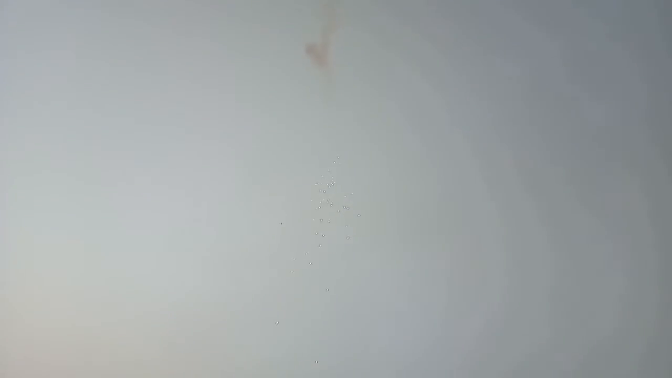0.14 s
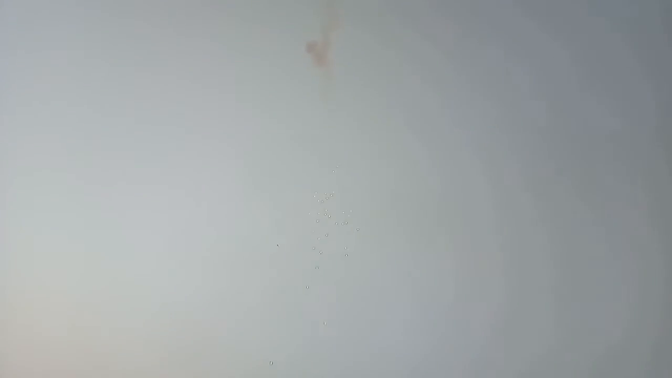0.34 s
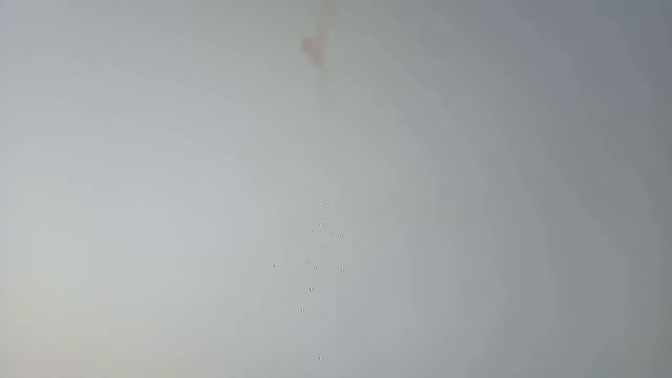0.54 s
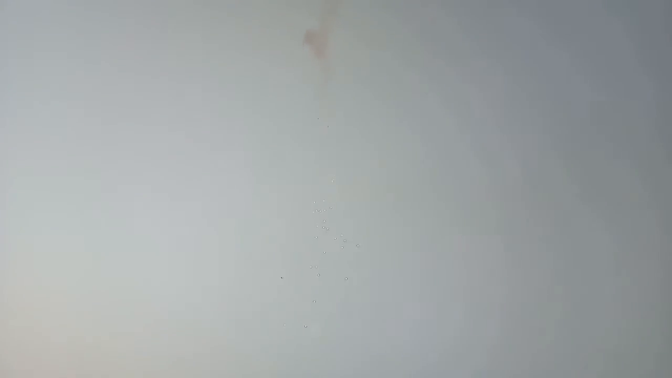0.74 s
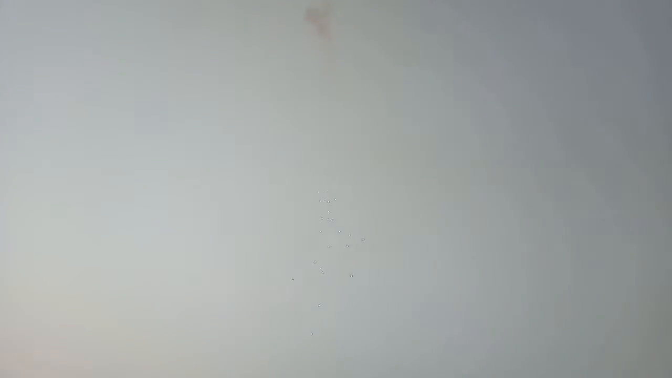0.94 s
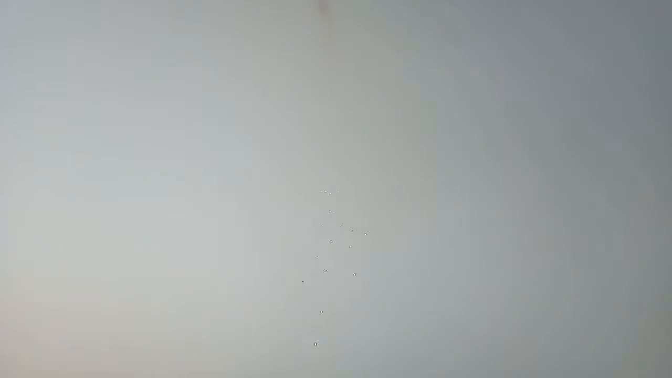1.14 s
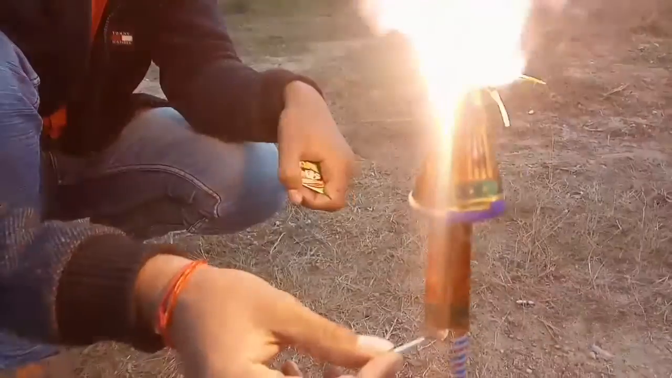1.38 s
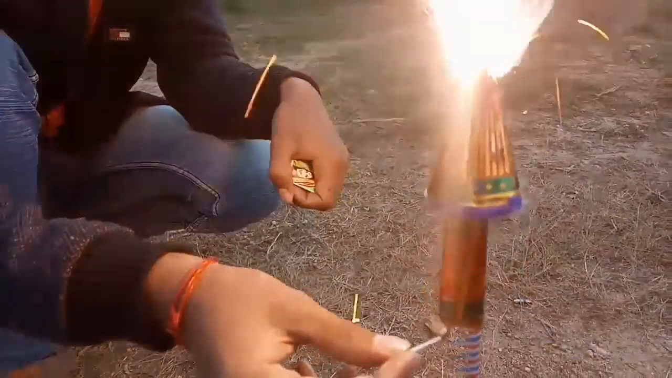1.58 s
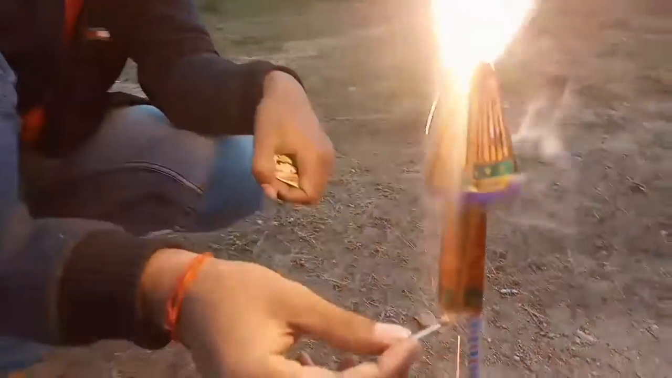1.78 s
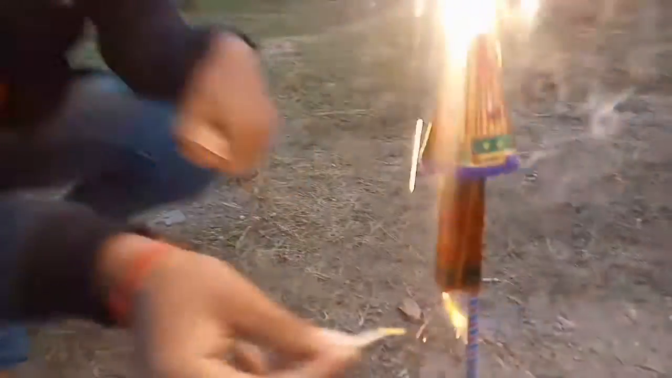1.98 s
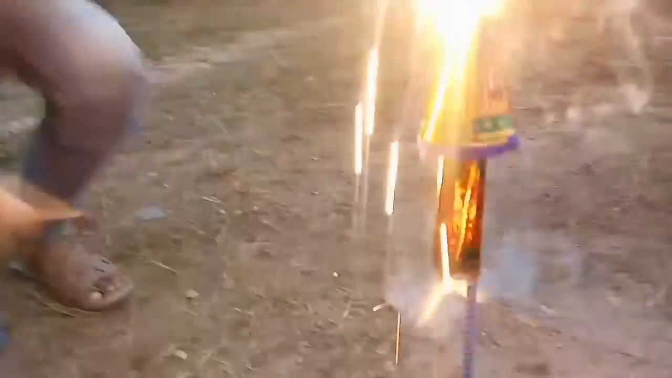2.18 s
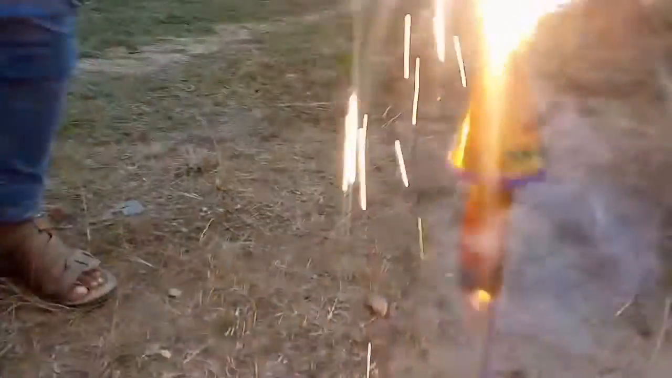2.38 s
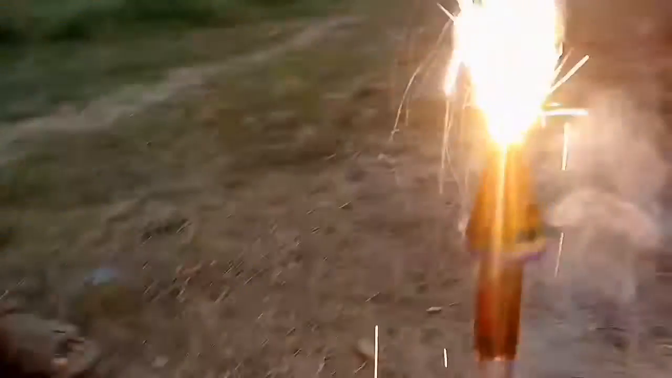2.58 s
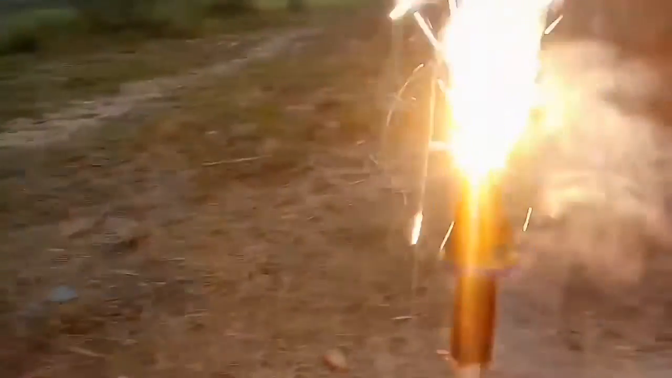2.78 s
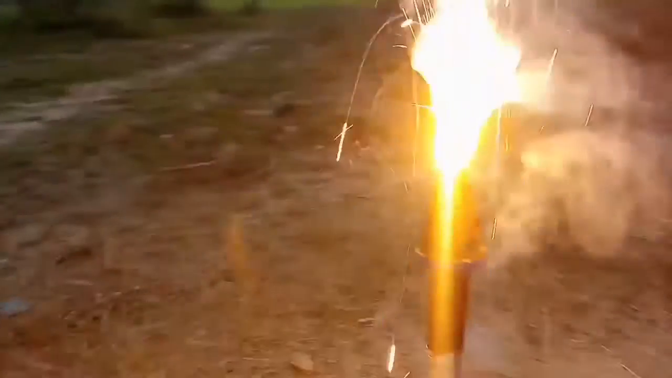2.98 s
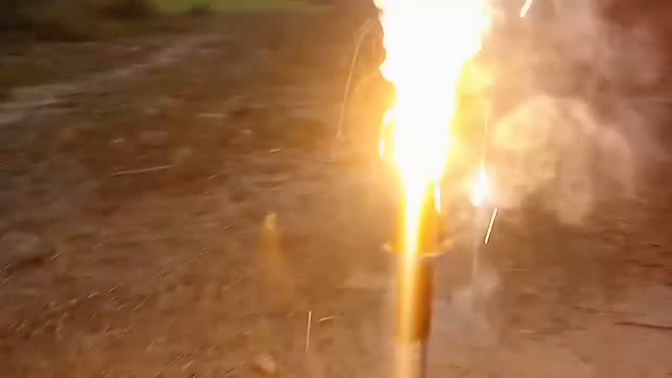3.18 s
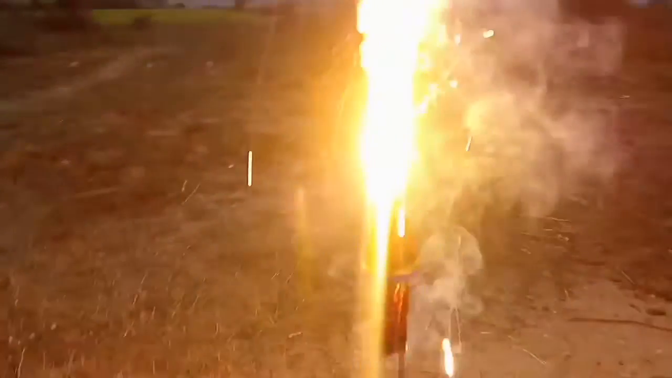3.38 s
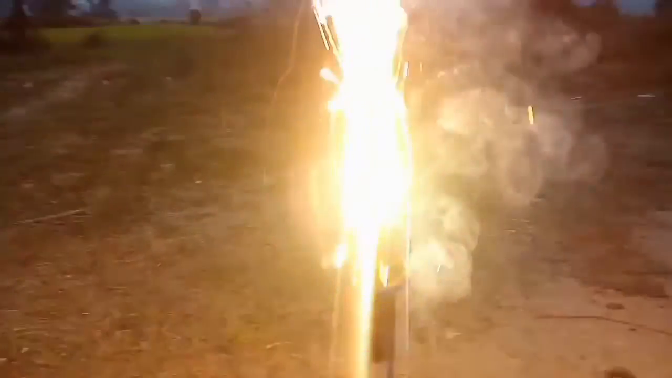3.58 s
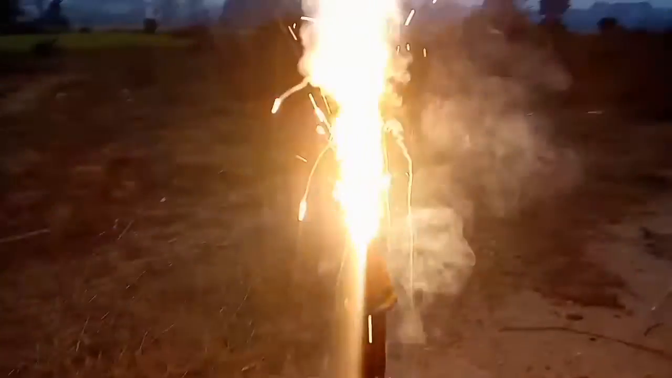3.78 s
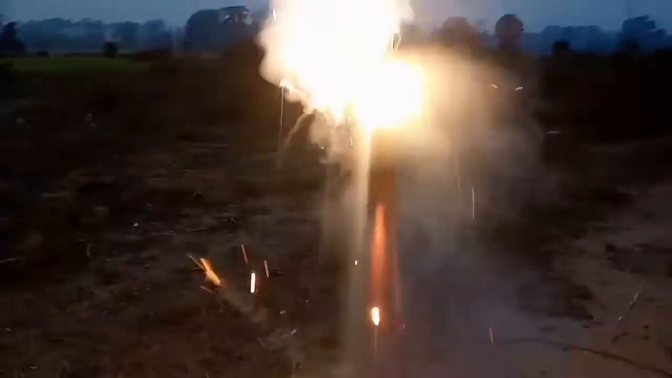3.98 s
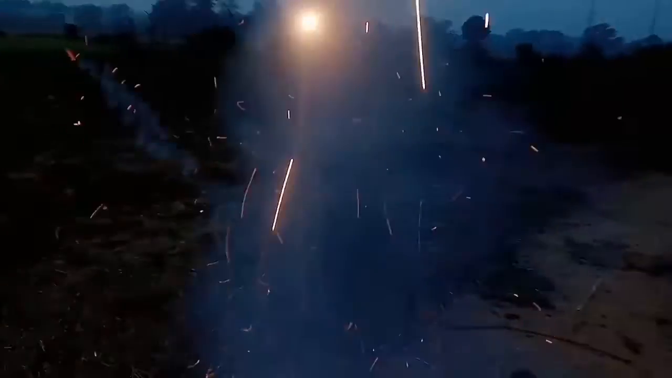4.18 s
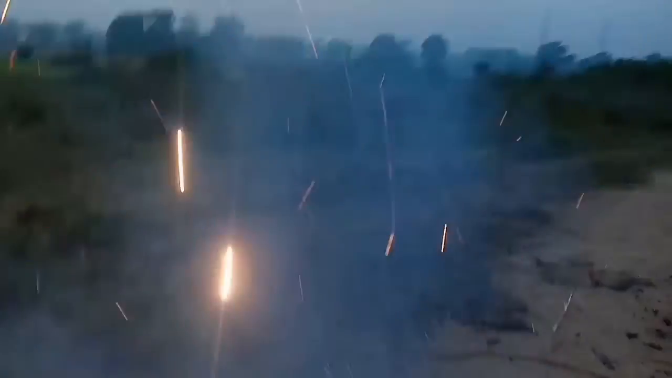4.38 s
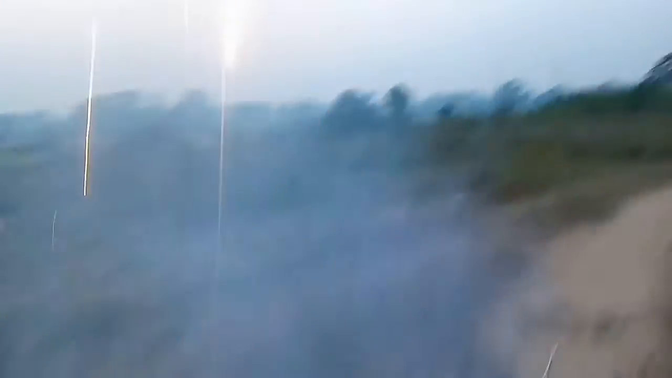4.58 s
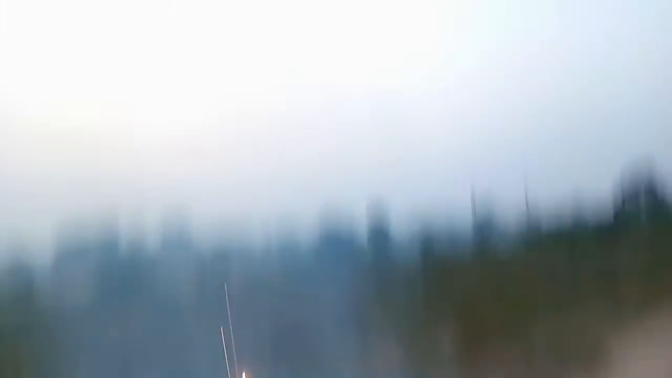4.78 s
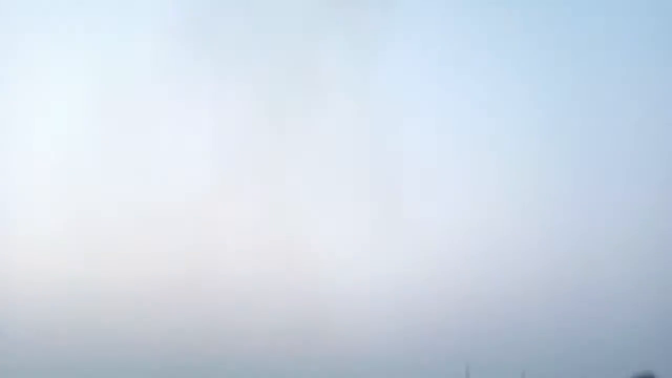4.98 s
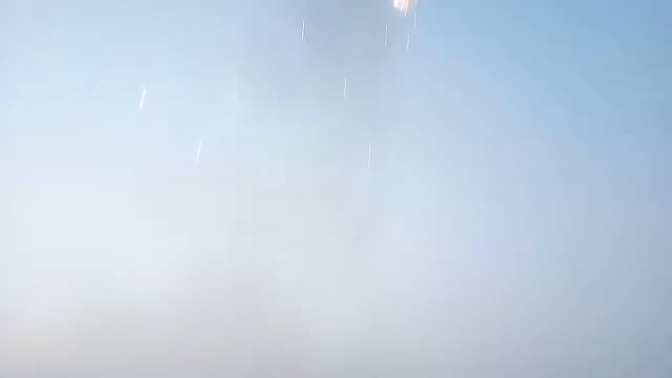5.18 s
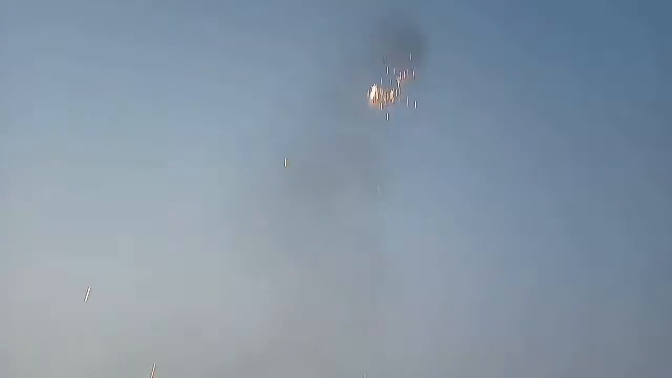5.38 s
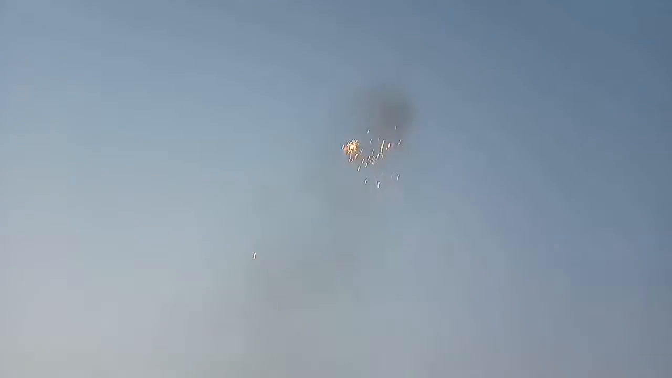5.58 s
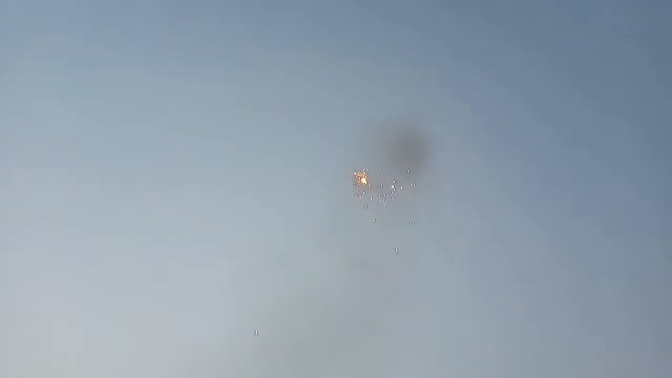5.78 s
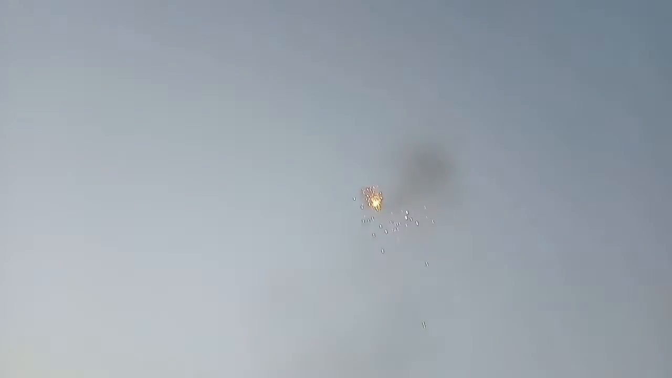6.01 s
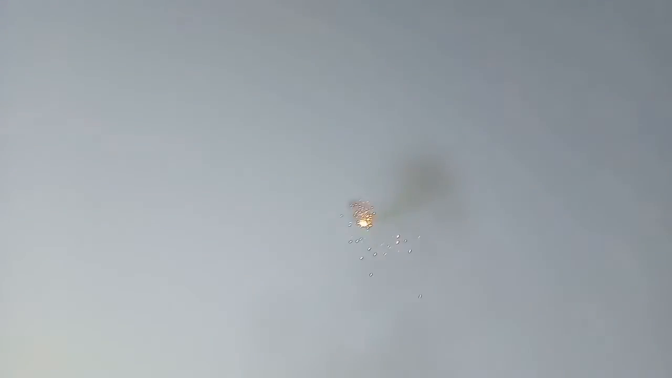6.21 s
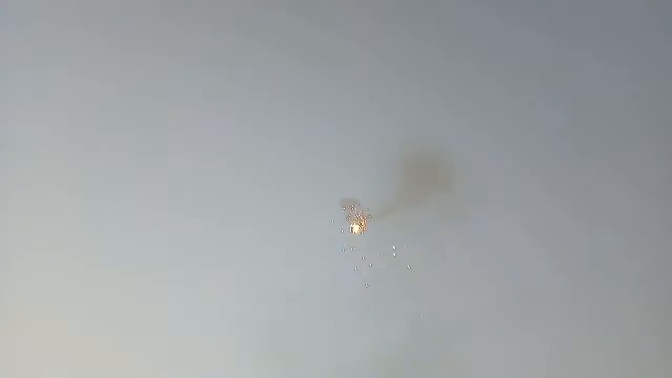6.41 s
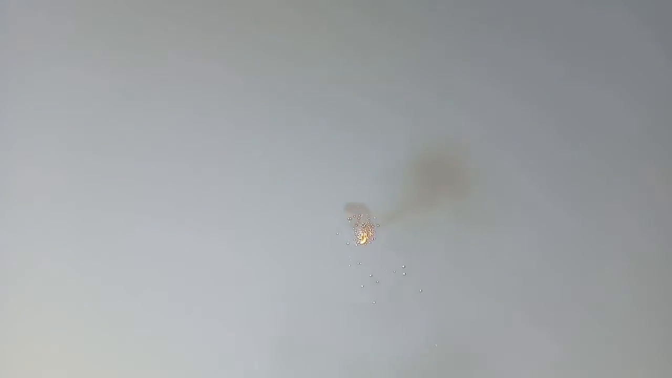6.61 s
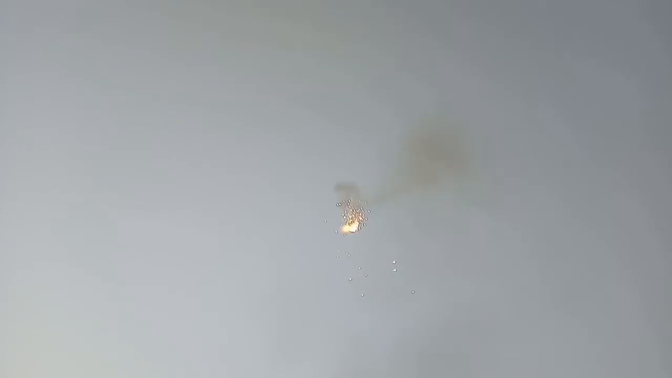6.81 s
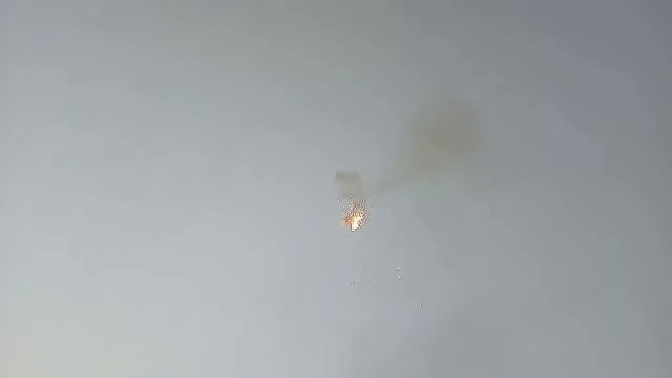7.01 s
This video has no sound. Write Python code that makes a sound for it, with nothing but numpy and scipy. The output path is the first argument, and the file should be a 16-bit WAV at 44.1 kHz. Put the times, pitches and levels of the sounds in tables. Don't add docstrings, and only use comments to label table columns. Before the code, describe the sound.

Quiet field with crickets and two bird calls, then a fountain firework hisses and crackles before a rocket motor roars, climbs and pops overhead.

```python
import sys
import numpy as np
from scipy import signal
from scipy.fft import rfft, irfft, next_fast_len
from scipy.io import wavfile
from scipy.ndimage import uniform_filter1d

SR = 44100
rng = np.random.default_rng(int(sys.argv[2]) if len(sys.argv) > 2 else 0)


def field_ratio(decibels):
    return 10 ** (np.asarray(decibels, dtype=float) / 20)


def transcribe(u):
    v = np.clip(np.atleast_2d(u).T, -1, 1)
    q = np.round(v * 32767).astype(np.int16)
    wavfile.write(sys.argv[1], SR, q)


N = 310905
T = np.arange(N) / SR
SCENE_CHANGES_S, SLOWED_FROM_S = 1.9, 2.738
IGNITION_S = 3.987


def in_time(rows):
    s, *columns = np.transpose(rows)
    return [np.interp(T, s, column) for column in columns]


def rms_one(x):
    return x / np.sqrt(np.mean(x ** 2) + 1e-20)


def band(x, low_hz, high_hz, order=2):
    sos = signal.butter(order, [low_hz, min(high_hz, .45 * SR)], "band", fs=SR, output="sos")
    return signal.sosfilt(sos, x)


def drift(rate):
    r = np.exp(-80 * np.pi * rate / SR)
    noise = rng.standard_normal(N // 40 + 2002)
    slow = signal.lfilter([1], [1, -2 * r, r * r], noise)[2000:]
    return np.interp(np.arange(N) / 40, np.arange(len(slow)), rms_one(slow))


def ring(clicks, hz, t60):
    r = field_ratio(-60 / (t60 * SR))
    w = 2 * np.pi * hz / SR
    return signal.lfilter([0, np.sin(w)], [1, -2 * r * np.cos(w), r * r], clicks + 1e-18)


def clicks_at(rows):
    out = np.zeros(N)
    out[[round(row[0] * SR) for row in rows]] = field_ratio(np.array(rows)[:, 1])
    return out


def window(start, length, edge):
    inside = np.minimum(T - start, start + length - T)
    return np.sin(np.pi / 2 * np.clip(inside / edge, 0, 1)) ** 2


def slowed(x):
    read = round(SLOWED_FROM_S * SR)
    parts = [x[..., :read]]
    spans = np.random.default_rng(4).uniform(.008, .023, 200) * SR
    for span in spans.astype(int):
        first = x[..., read:read + span]
        following = x[..., read + span:read + 2 * span]
        fade = np.linspace(0, 1, span)
        parts += [first, following * (1 - fade) + first * fade]
        read += span
    return np.concatenate(parts, axis=-1)[..., :N]


def shaped(x, colour):
    size = next_fast_len(N)
    hz = np.maximum(np.fft.rfftfreq(size, 1 / SR), 1)
    hz_points, db_points = np.transpose(colour)
    gain = field_ratio(np.interp(np.log(hz), np.log(hz_points), db_points, left=-99))
    return rfft(x, size) * gain, hz


def coloured(white, colour, groups_db, patchy_db, in_step=1.0):
    spectrum, hz = shaped(white, colour)
    centres = np.array([200, 420, 750, 1200, 1650, 2200, 3000, 4000, 4900, 5700, 7600, 9200, 12000, 15000])
    groups, together = np.zeros((4, N)), drift(18.6)
    for k, one in enumerate(np.eye(len(centres))):
        part = irfft(spectrum * np.interp(np.log(hz), np.log(centres), one))[:N]
        flicker = field_ratio(patchy_db * (in_step * together + .8 * drift(8)))
        groups[np.searchsorted([1800, 5000, 8500], centres[k])] += flicker * part
    return sum(field_ratio(db) * rms_one(group) for group, db in zip(groups, groups_db))


def cricket(per_s, top_hz, fall_hz, duty, wobble):
    cycle = np.cumsum(per_s * (1 + wobble * drift(2.4))) / SR + rng.random()
    part = np.clip(cycle % 1 / duty, 0, 1)
    return np.sin(np.pi * part) * np.sin(2 * np.pi * np.cumsum(top_hz - fall_hz * part) / SR)


# f/Hz, level/dB (per Hz)
CHORUS_COLOUR = [(2880, -60), (4900, -30), (5030, -28), (5830, -4), (6460, 1), (7710, -11), (8090, -15),
                 (8750, -38), (9200, -46), (12000, -76), (20200, -120)]


def chorus():
    singers = [(35.5, 7100, 1300, 0), (46, 7300, 1400, -1), (47.8, 6700, 900, -2),
               (110, 8200, 900, -10), (24.5, 6600, 1100, -3), (85, 7800, 1200, -7)]
    x = sum(field_ratio(db + 4.5 * drift(10)) * cricket(rate, hz, fall, duty=.5, wobble=.1)
            for rate, hz, fall, db in singers)
    smear = rng.standard_normal(900) * field_ratio(-np.arange(900) * .06)
    smeared = rms_one(signal.fftconvolve(x, smear)[:N])
    far = rms_one(irfft(shaped(rng.standard_normal(N), CHORUS_COLOUR)[0])[:N])
    singing = rms_one(band(rms_one(x) + .45 * smeared, 5400, 8300, order=6) + .5 * far)
    before_db, later_db = -55.5, -55.5
    return field_ratio(np.where(T < SCENE_CHANGES_S, before_db, later_db)) * slowed(singing)


# t/s, length/s, level/dB
CHIRPS = [
    (.0, 0.084, -71),
    (.17, 0.094, -74),
    (0.57, 0.15, -73),
    (0.808, 0.16, -72),
    (1.05, .145, -69),
    (1.275, 0.15, -77),
    (1.502, 0.074, -76),
    (5.266, 0.3, -60),
    (6.622, 0.25, -71),
    (6.8, 0.063, -69),
]


def near_cricket():
    near = cricket(55.5, 4640, 600, duty=0.45, wobble=0.03)
    near = near * sum(field_ratio(db + 3.2) * window(s - .015, length + 0.035, 0.05) for s, length, db in CHIRPS)
    return near * field_ratio(2.5 * drift(25)) + field_ratio(-7) * np.roll(near, round(.009 * SR))


# f/Hz, level/dB (per Hz)
LAND = [(120, -40), (220, -17), (400, -3), (690, -9), (1100, -10), (1500, -15), (2000, -22), (3700, -28),
        (5000, -31), (9000, -43), (13500, -46), (14800, -28), (15600, -30), (15800, -90)]


def far_land():
    land = coloured(rng.standard_normal(N), LAND, (0.0, -10.5, 0, -17.0), patchy_db=4.5, in_step=0.21)
    level_db, sinks_db_per_s = -70, 1
    return field_ratio(level_db - sinks_db_per_s * T) * land * (T < SCENE_CHANGES_S)


# f/Hz, level/dB (per Hz)
WIND_COLOUR = [(18, -42), (30, -14), (65, -6), (97, 0.1), (125, -1.5), (160, -1.5), (190, -10), (215, -30),
               (400, -60)]
# f/Hz, level/dB (per Hz)
BLAST_COLOUR = [(18, -46), (40, -20), (70, -10), (100, -2), (160, 0), (260, -4), (450, -9), (800, -30)]
# t/s, length/s, level/dB
PUFFS = [
    (3.752, .04, -44),
    (3.8, .14, -49),
]


def buffet():
    gusts_db = 1.35
    white = slowed(rng.standard_normal(N) * field_ratio(gusts_db * drift(11)))
    wind, blast = (rms_one(irfft(shaped(white, colour)[0])[:N]) for colour in (WIND_COLOUR, BLAST_COLOUR))
    end = IGNITION_S + 0.43
    lull_db, lull_s = -10, 0.42
    wind_before_db, wind_later_db, eases_db_per_s = -63, -58, 2.2
    wind_db = np.where(T < SCENE_CHANGES_S, wind_before_db, wind_later_db) + lull_db * window(end, lull_s, .1)
    wind_db = wind_db - eases_db_per_s * np.clip(T - end - lull_s, 0, None)
    flame_width_db = in_time(MOTOR)[1] + first_blast_db()
    blast_dies_s = 0.1
    blast_db = -25 + 0.5 * flame_width_db - 30 * np.clip(T - end, 0, None) / blast_dies_s
    near = window(IGNITION_S - .004, 1.2, .006) * field_ratio(blast_db)
    near = near * field_ratio(1.8 * drift(14))
    puff = sum(field_ratio(db) * window(s, length, 0.013) for s, length, db in PUFFS)
    return field_ratio(wind_db) * wind + (near + puff) * blast


# t/s, level/dB (peak), f/Hz
RUSTLES = [
    (.222, -66, 2840),
    (.225, -101, 1090),
    (.33, -57, 860),
    (1.27, -66, 2150),
    (1.29, -66, 2100),
    (1.37, -62, 2200),
    (1.392, -64, 1540),
    (.87, -75, 3350),
    (.89, -66, 3350),
]


def rustles():
    return sum(ring(clicks_at([(s, db)]), hz, 0.031) for s, db, hz in RUSTLES)


# t/s, length/s, f/Hz, level/dB
TUKS = [
    (0.59, 0.103, 850, -61.5),
    (1.099, 0.11, 854, -59),
]
# multiple of f, level/dB
TUK_PARTIALS = [(1, -8), (2, 0), (3, -5)]
# t/s, length/s, first f/Hz, top f/Hz, level/dB
WHISTLES = [
    (0.458, 0.1, 1195, 1330, -74),
    (0.972, .08, 1400, 1444, -81),
    (1.171, 0.3, 1206, 1504, -70),
]


def birds():
    out = np.zeros(N)
    for s, length, hz, db in TUKS:
        note = sum(field_ratio(p) * np.sin(2 * np.pi * k * hz * T) for k, p in TUK_PARTIALS)
        fading = field_ratio(-40 * np.clip(T - s, 0, 1))
        out += field_ratio(db + 2.5) * window(s, length + 0.021, 0.033) * fading * note
    rise_hz_per_s, sags_after_s, sag_hz_per_s, tires_db_per_s = 2200, .235, 4200, 40
    for s, length, first_hz, top_hz, db in WHISTLES:
        age = np.clip(T - s, 0, length)
        hz = np.minimum(first_hz + rise_hz_per_s * age, top_hz)
        hz = hz - sag_hz_per_s * np.clip(age - sags_after_s, 0, None)
        hz = uniform_filter1d(hz, size=1200)
        whistle = np.sin(2 * np.pi * np.cumsum(hz) / SR)
        out += field_ratio(db + 6 - tires_db_per_s * age) * window(s, length, .03) * whistle
    echo_t60_s, echo_db = .2, -12
    echoes = rng.standard_normal(SR // 4) * field_ratio(-60 * T[:SR // 4] / echo_t60_s)
    return out + field_ratio(echo_db) * signal.fftconvolve(out, echoes / np.sqrt(np.sum(echoes ** 2)))[:N]


def jet(curve, tone, colour, sputter, patchy_db, widened_db=0):
    level, width = in_time(curve)
    age = T - curve[0][0]
    body, edge, sizzle = (db + share * (width + widened_db) + db_per_s * age for db, share, db_per_s in tone)
    bursts = rng.random(N) < 900 / SR
    sizes = field_ratio(3.5 * np.minimum(rng.exponential(1, N), 5))
    grains = bursts * sizes * rng.choice([-1, 1], N)
    white = slowed(rng.standard_normal(N) + sputter * rms_one(grains))
    return field_ratio(level) * coloured(white, colour, (body, edge, 0, sizzle), patchy_db, in_step=0.19)


# t/s, length/s, level/dB above the burn
SPITS = [
    (2.222, .04, 7),
    (2.613, 0.029, 5),
    (6.72, 0.076, 2),
]


def spits():
    return field_ratio(sum(db * window(s, length, 0.014) for s, length, db in SPITS))


# t/s, level/dB, flame width/dB
FOUNTAIN = [
    (2.15, -59.5, 7.5),
    (2.6, -50, -0.5),
    (2.76, -50.5, -0.5),
    (2.85, -45.5, -1),
    (2.93, -49.5, -1),
    (3.22, -45.5, 0.5),
    (3.55, -47, -0.5),
    (3.87, -43.5, 0.5),
    (3.95, -38.5, -2.5),
]
# level/dB at width 0, share of width, drift in dB per s
FOUNTAIN_TONE = [(-10, 1.2, 1.2), (-5, 0.87, -0.85), (-2.5, 0.42, -2)]
# f/Hz, level/dB (per Hz)
FOUNTAIN_COLOUR = [(120, -36), (200, -6), (316, -4), (600, -9), (2580, -12), (4900, -9), (6000, -2),
                   (6900, 1), (7600, -2), (8400, -11), (11500, -17), (13700, -17), (14700, -5), (15600, -7),
                   (15800, -70)]


def fountain():
    hiss = jet(FOUNTAIN, FOUNTAIN_TONE, FOUNTAIN_COLOUR, sputter=0.45, patchy_db=0.26)
    choked = 1 - .7 * window(3.942, .06, .006)
    return spits() * hiss * (T > SCENE_CHANGES_S) * (T < 3.99) * choked


# t/s, level/dB (peak)
SPARKS = [(2.2335, -27), (2.247, -33), (2.297, -38), (2.395, -40), (2.582, -36), (2.672, -40),
          (2.9252, -15), (2.9444, -15), (3.7305, -22), (3.7327, -24), (3.747, -22), (3.7491, -24),
          (6.153, -33), (6.163, -35), (6.2315, -35)]
# f/Hz, level/dB (per Hz)
SPARK_COLOUR = [(500, -40), (1500, -14), (4800, -7), (6900, 0), (8300, -8), (13500, -9), (14900, -3),
                (16500, -8)]


def sparks():
    spark = irfft(shaped(clicks_at(SPARKS), SPARK_COLOUR)[0])[:N]
    out = -spark / np.abs(spark).max() * field_ratio(max(db for s, db in SPARKS) + 4.5)
    return out + field_ratio(-18) * np.roll(out, round(.0027 * SR))


# t/s, level/dB (peak), f/Hz, t60/s
POPS = [
    (3.253, -39.5, 800, 0.0078),
    (3.27, -41, 800, 0.0079),
    (3.7572, -37, 314, 0.0085),
    (3.7726, -37, 313, 0.012),
    (3.758, -42, 990, 0.007),
    (3.774, -40, 1000, .008),
    (5.2975, -24.5, 1040, 0.0064),
    (5.3122, -24, 1080, 0.0059),
]


def pops():
    out = np.zeros(N)
    for s, db, hz, t60 in POPS:
        out += 1.97 * band(ring(clicks_at([(s, db)]), hz, t60), 0.36 * hz, 1.8 * hz)
    return out


def first_blast_db():
    width_db, holds_s = 8, 0.037
    return width_db * window(IGNITION_S - .04, .04 + holds_s, .012)


def spent():
    return np.pi / 2 * np.clip((T - 5.35) / .1, 0, 1)


# t/s, level/dB, flame width/dB
MOTOR = [
    (3.987, -13.5, -10),
    (4.15, -13, -0.5),
    (4.3, -13, 2),
    (4.41, -14, .4),
    (4.483, -17.5, -4),
    (4.565, -25.5, -.3),
    (4.85, -24.5, -1.2),
    (5.105, -38.5, -0.05),
    (5.45, -53.5, 5),
]
# level/dB at width 0, share of width, drift in dB per s
MOTOR_TONE = [(-6, 1.38, -1.3), (-4.5, 0.99, 2), (-9, 0.56, -1.1)]
# f/Hz, level/dB (per Hz)
MOTOR_COLOUR = [(110, -40), (200, -14), (450, -5), (1600, -4), (2530, -7), (4900, -7), (5900, -2),
                (6700, 1), (7500, -2), (8300, -13), (13600, -24), (14700, -10), (15600, -11), (15800, -70)]
# t/s, level/dB
IGNITION_HEARD_EARLY = [
    (3.95, -49),
    (3.958, -36),
    (3.9645, -17.5),
    (3.968, -21),
    (3.9705, -55),
    (3.975, -74),
]


def motor():
    roar = jet(MOTOR, MOTOR_TONE, MOTOR_COLOUR, sputter=0.33, patchy_db=0.34, widened_db=first_blast_db())
    lit = field_ratio(np.clip((T - IGNITION_S) * 4500, -150, 0))
    early = field_ratio(in_time(IGNITION_HEARD_EARLY)[0] - MOTOR[0][1]) * (T > IGNITION_HEARD_EARLY[0][0])
    return roar * np.maximum(lit, early) * np.cos(spent())


# t/s, level/dB, flame width/dB
ALOFT = [
    (5.35, -46.5, 0.5),
    (5.5, -52.5, 4),
    (5.86, -58, 4),
    (6.03, -52.5, 0.5),
    (6.24, -48.5, -3.5),
    (6.38, -44.5, -8.5),
    (6.58, -59, 5.5),
    (6.8, -54.5, -0.6),
    (7.05, -61, 7),
]
# level/dB at width 0, share of width, drift in dB per s
ALOFT_TONE = [(-0.06, 1.06, 0.5), (-3.5, 0.57, 0.25), (-9, -0.44, -7)]
# f/Hz, level/dB (per Hz)
ALOFT_COLOUR = [(120, -35), (250, -6), (718, -1), (1720, -3), (2500, -8), (4900, -15), (5900, -5),
                (6500, -1), (7300, -5), (8200, -19), (9600, -23), (13300, -33), (14800, -20), (15600, -22),
                (15800, -80)]


def far_fountain():
    hiss = jet(ALOFT, ALOFT_TONE, ALOFT_COLOUR, sputter=0.079, patchy_db=1.25)
    return spits() * hiss * np.sin(spent())


# t/s, level/dB
KNOCKS = [
    (6.1545, -40),
    (6.1632, -38.5),
    (6.172, -39.5),
    (6.183, -50),
    (6.2045, -44),
]
# f/Hz, level/dB, t60/s
HOLLOW = [
    (280, -4, 0.081),
    (823, 3, 0.047),
    (1690, 1, .014),
]


def hollow_knock():
    soft = np.convolve(clicks_at(KNOCKS), np.hanning(12) / 5.6)[:N]
    return sum(field_ratio(db) * ring(soft, hz, t60) for hz, db, t60 in HOLLOW)


def scene():
    field = chorus() + near_cricket() + far_land() + buffet() + rustles() + birds()
    firework = fountain() + sparks() + pops() + motor() + far_fountain()
    return (field + firework + hollow_knock())[None]


def band_limit(x):
    return signal.sosfilt(signal.butter(12, 16820, fs=SR, output="sos"), x)


# start t/s, end t/s
PIECES = [
    (0, 1.613),
    (2.152, 2.705),
    (2.738, 7.06),
]


def record(dry):
    kept = sum(window(a - .002 * (a == 0), b - a, .002) for a, b in PIECES)
    fade_out_s, fade_in_s, fade_in_power, last_fade_s = 0.17, 0.69, 1.23, 0.14
    fade_out = np.clip((PIECES[0][1] + 0.024 - T) / fade_out_s, 0, 1)
    fade_in = np.clip((T - PIECES[1][0] + .004) / fade_in_s, 0, 1) ** fade_in_power
    end_dip = np.clip((N / SR + 0.24 - T) / (.15 + last_fade_s), 0, 1)
    limited = dry / (1 + np.abs(dry / .72) ** 4) ** .25
    top_cut = signal.cheby2(10, 45, 16600, fs=SR, output="sos")
    mix = signal.sosfilt(top_cut, limited) * kept * (fade_out + fade_in * end_dip)
    return band_limit(mix)


dry = scene()
out = record(dry)
transcribe(out)
```